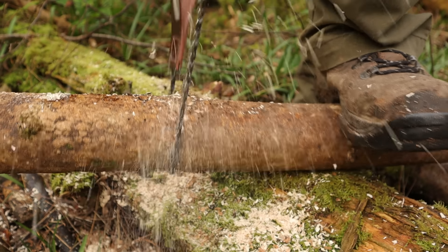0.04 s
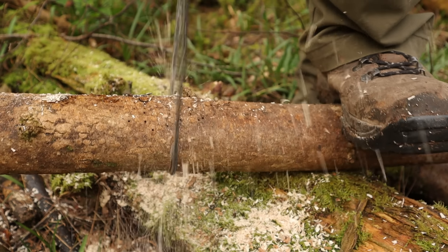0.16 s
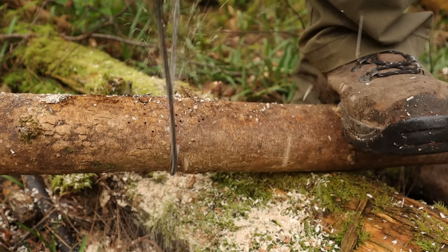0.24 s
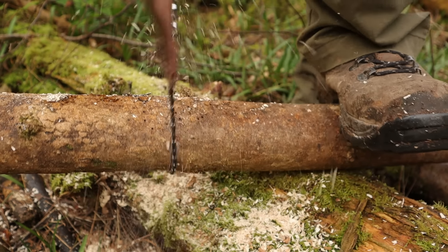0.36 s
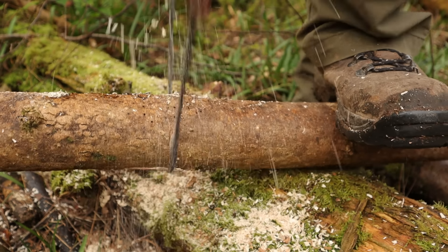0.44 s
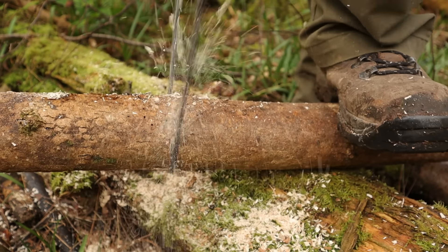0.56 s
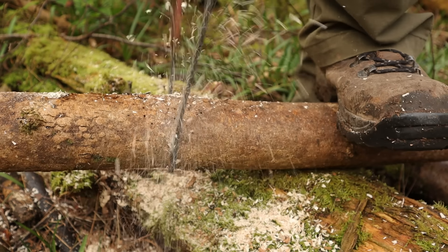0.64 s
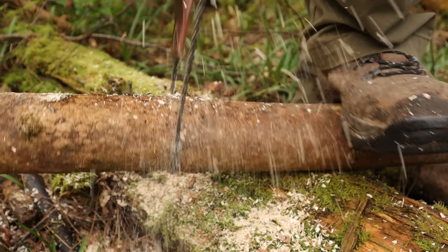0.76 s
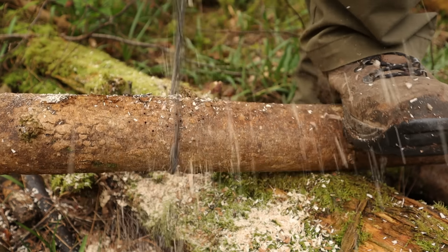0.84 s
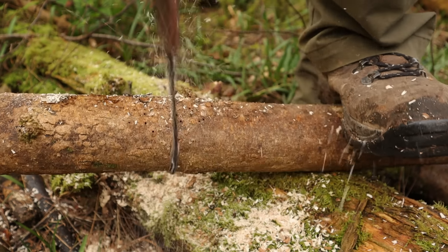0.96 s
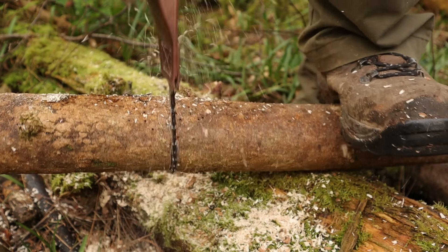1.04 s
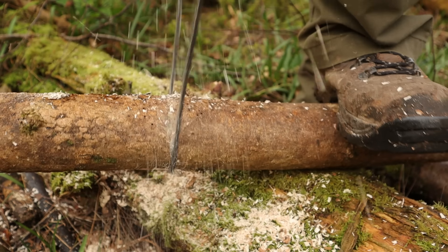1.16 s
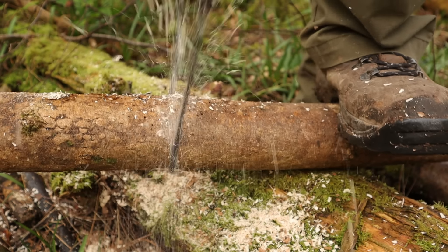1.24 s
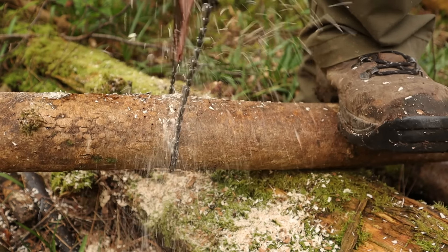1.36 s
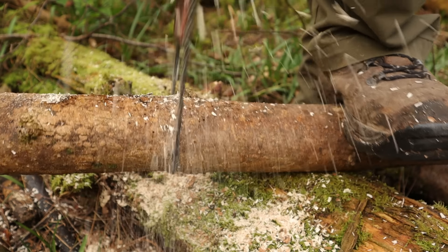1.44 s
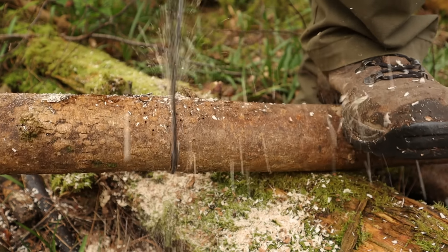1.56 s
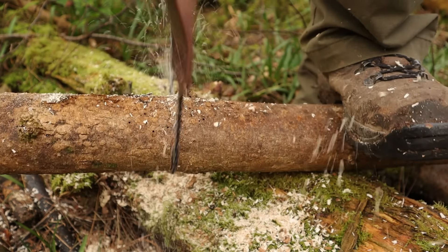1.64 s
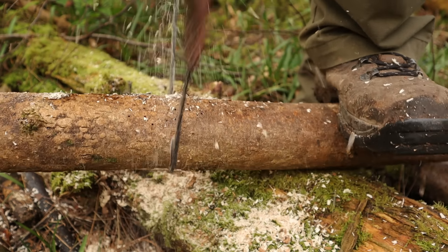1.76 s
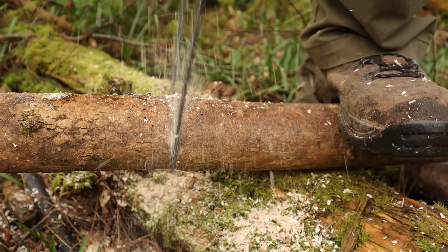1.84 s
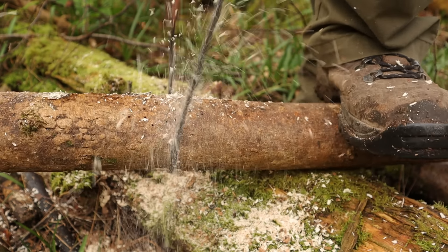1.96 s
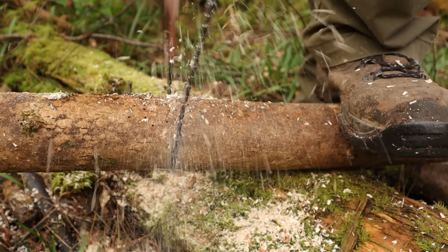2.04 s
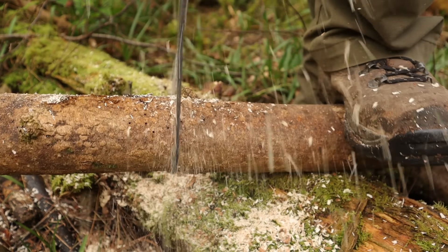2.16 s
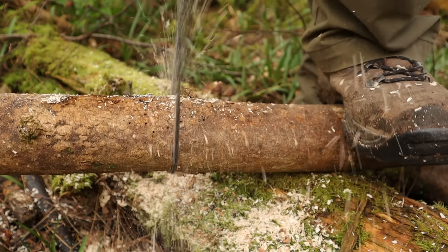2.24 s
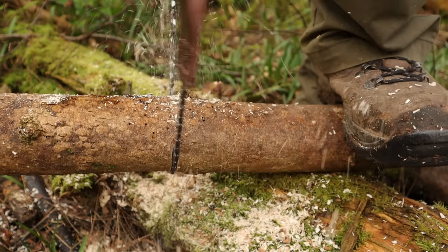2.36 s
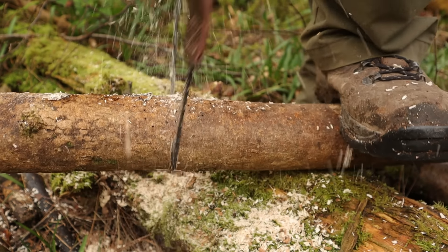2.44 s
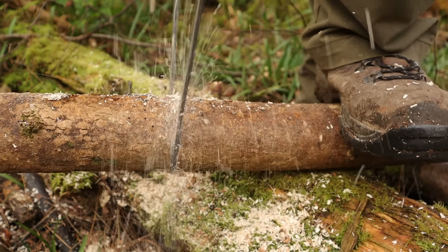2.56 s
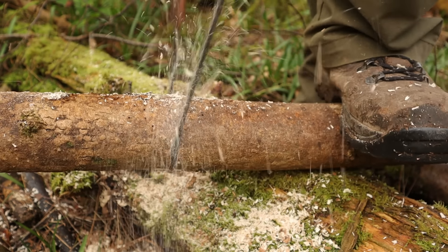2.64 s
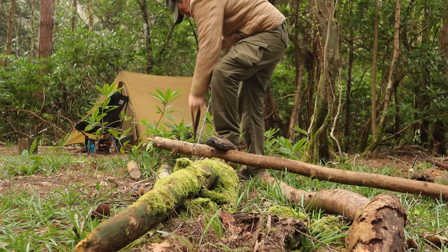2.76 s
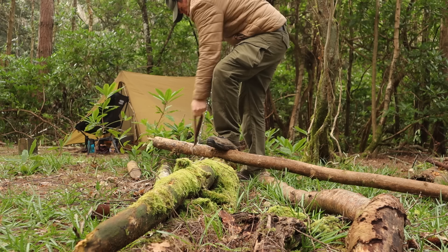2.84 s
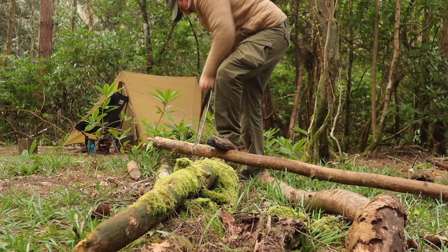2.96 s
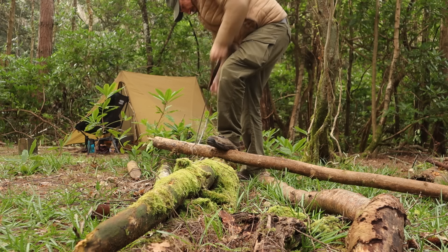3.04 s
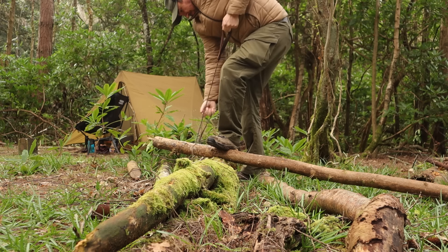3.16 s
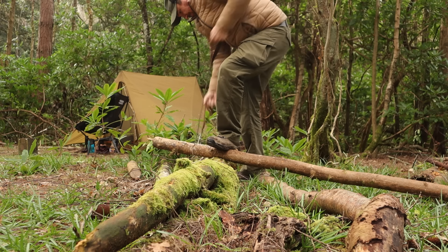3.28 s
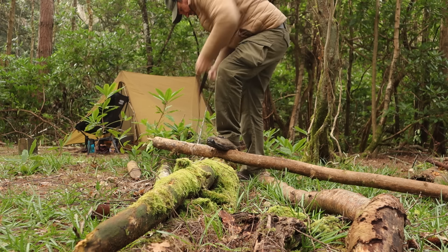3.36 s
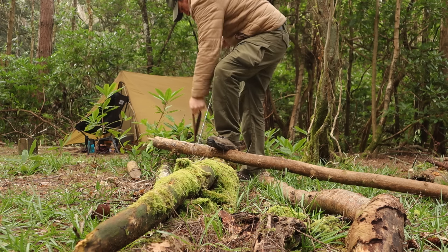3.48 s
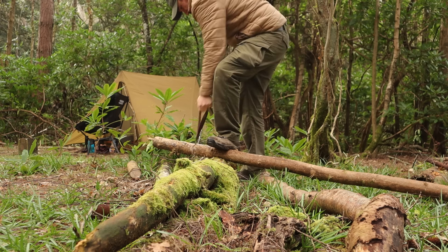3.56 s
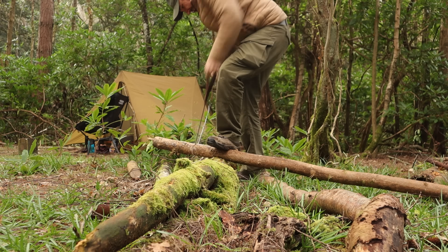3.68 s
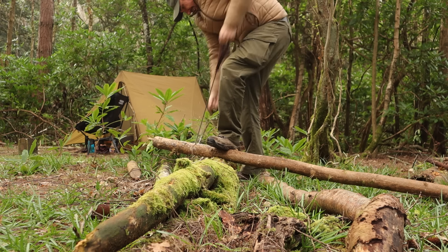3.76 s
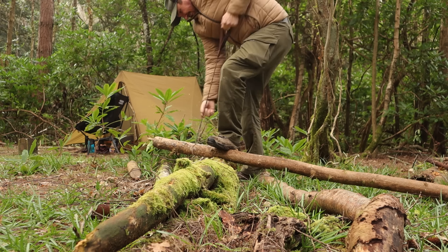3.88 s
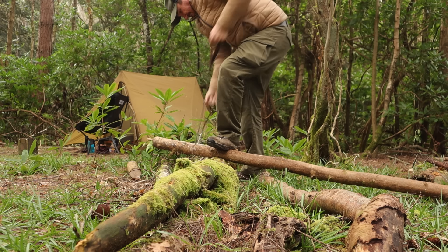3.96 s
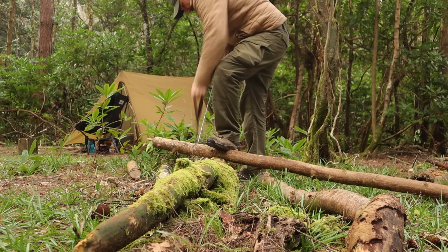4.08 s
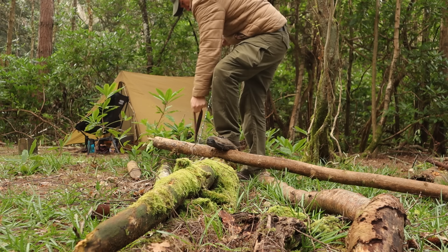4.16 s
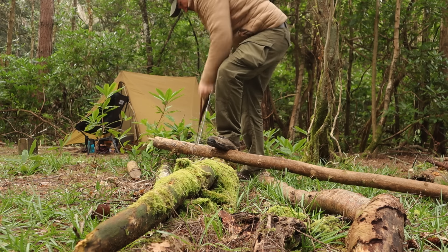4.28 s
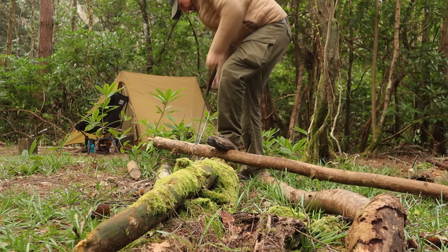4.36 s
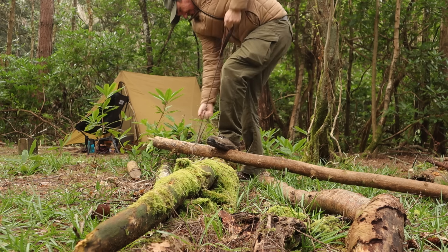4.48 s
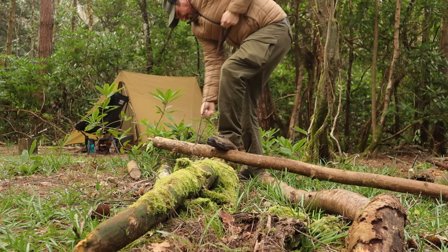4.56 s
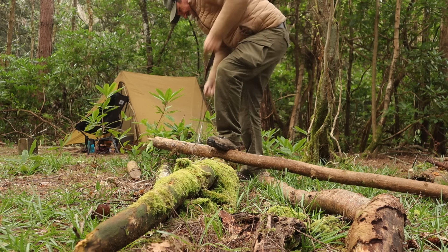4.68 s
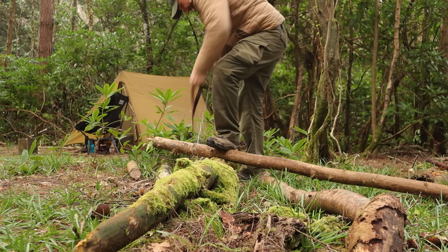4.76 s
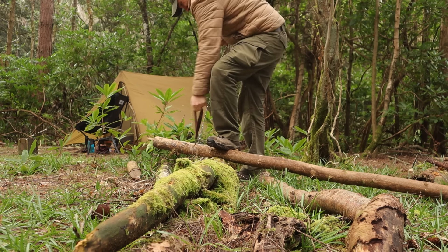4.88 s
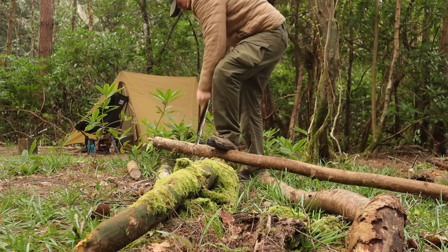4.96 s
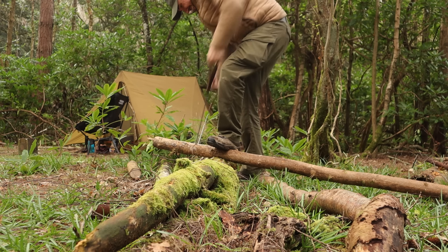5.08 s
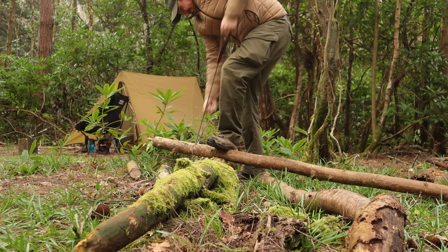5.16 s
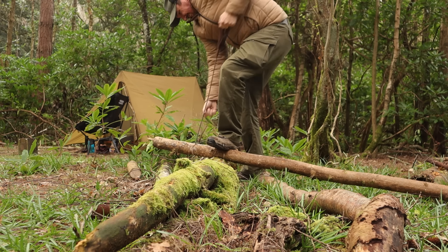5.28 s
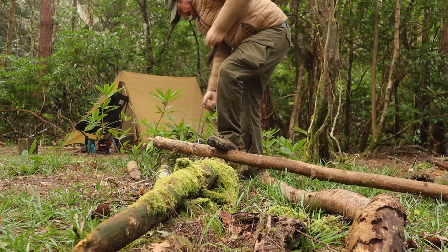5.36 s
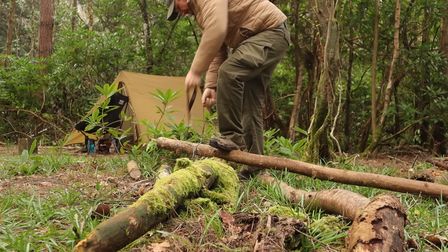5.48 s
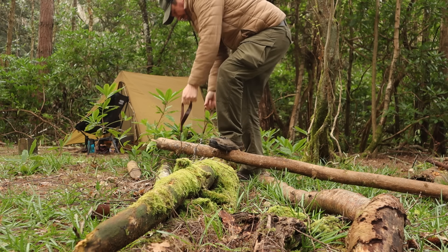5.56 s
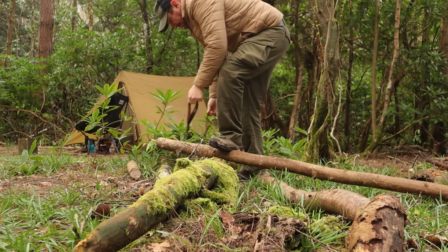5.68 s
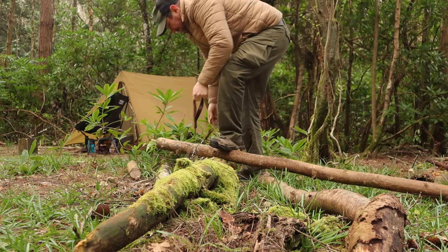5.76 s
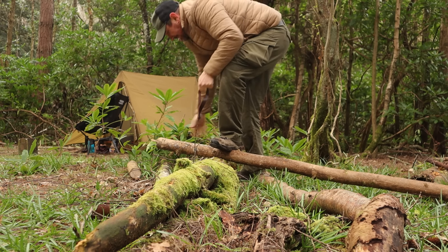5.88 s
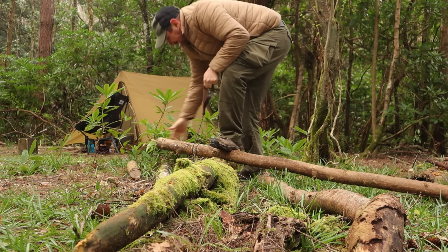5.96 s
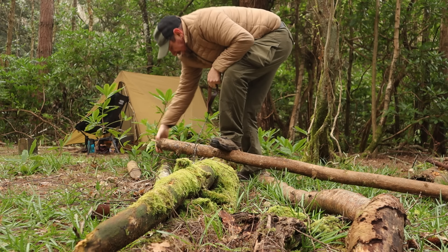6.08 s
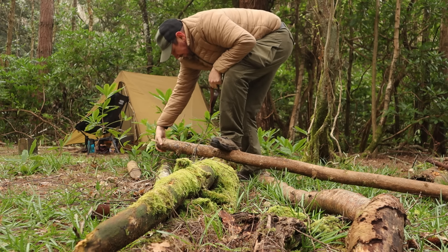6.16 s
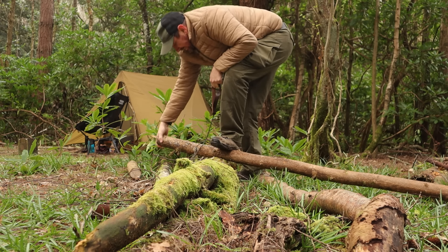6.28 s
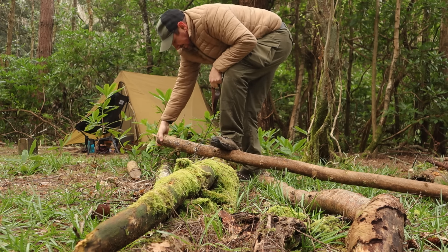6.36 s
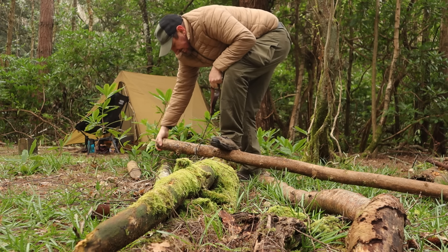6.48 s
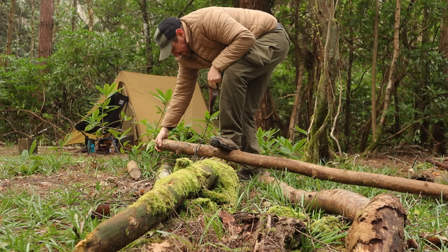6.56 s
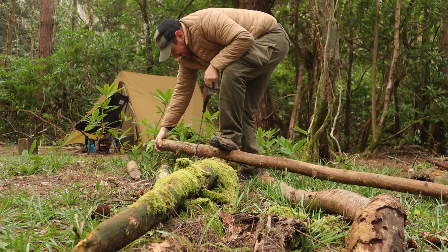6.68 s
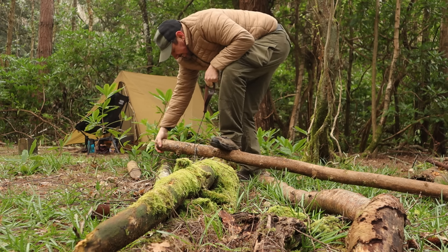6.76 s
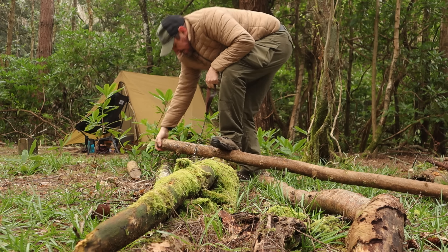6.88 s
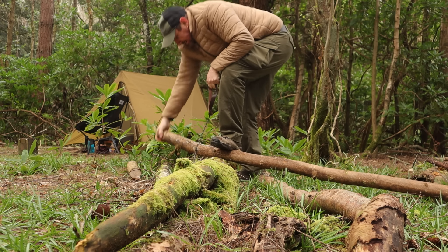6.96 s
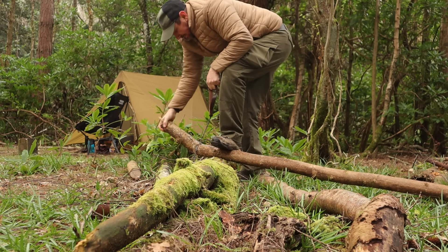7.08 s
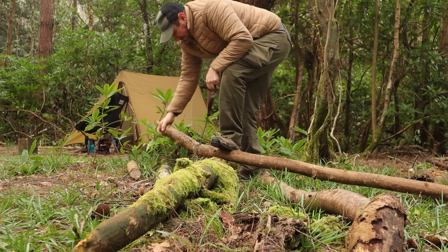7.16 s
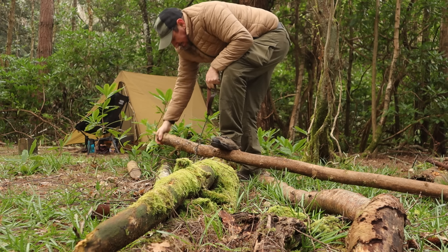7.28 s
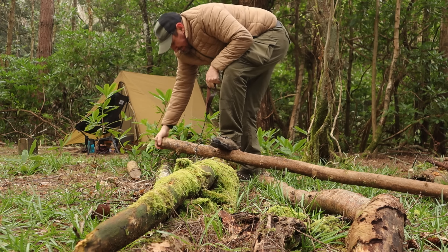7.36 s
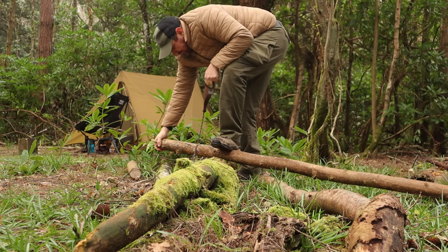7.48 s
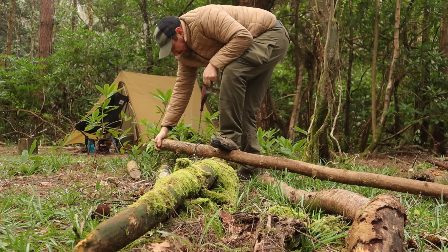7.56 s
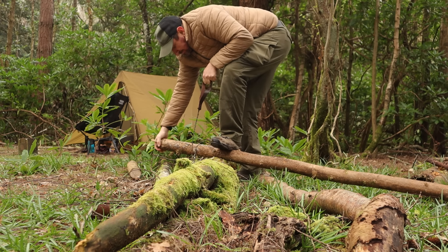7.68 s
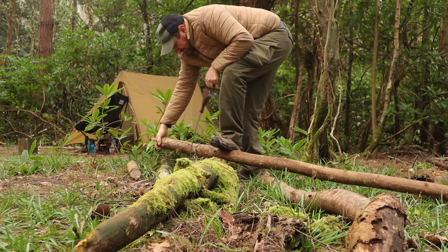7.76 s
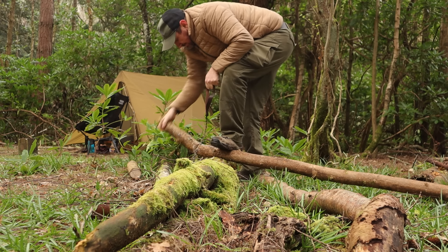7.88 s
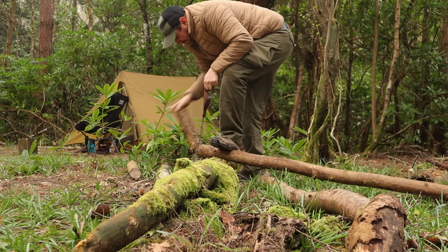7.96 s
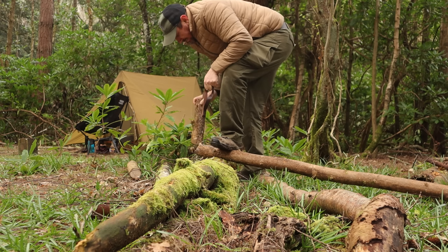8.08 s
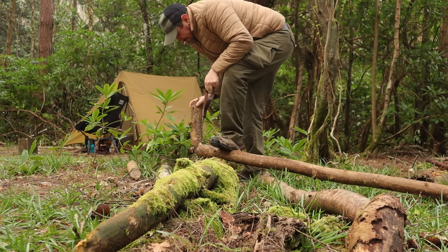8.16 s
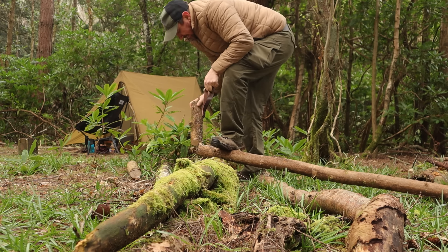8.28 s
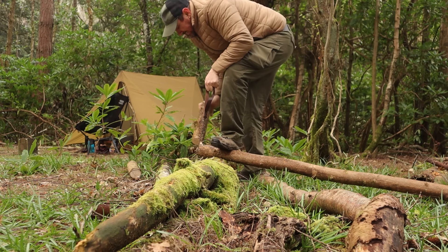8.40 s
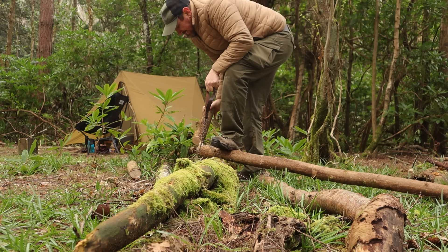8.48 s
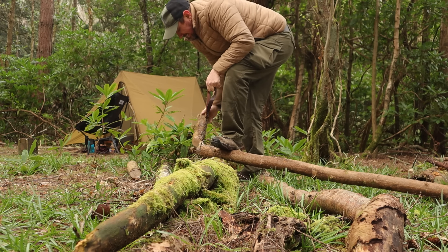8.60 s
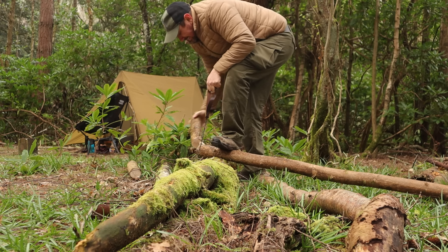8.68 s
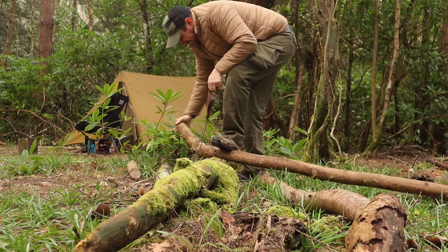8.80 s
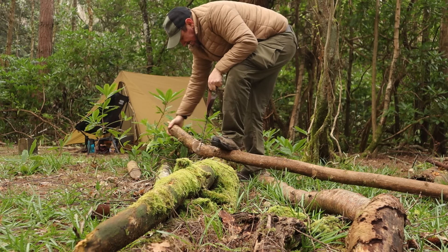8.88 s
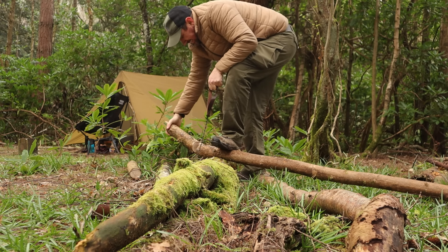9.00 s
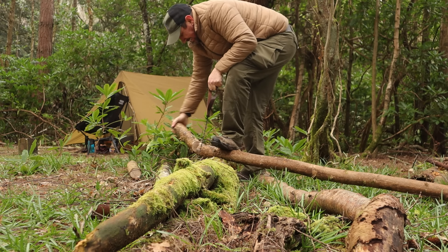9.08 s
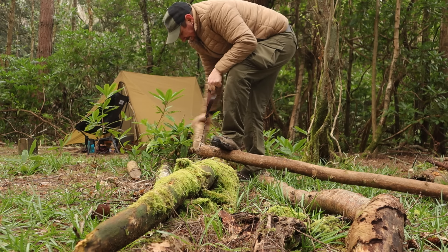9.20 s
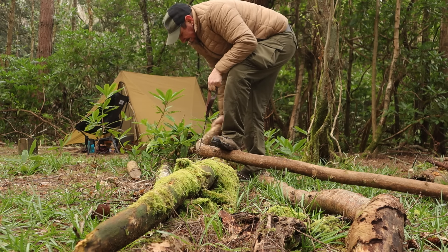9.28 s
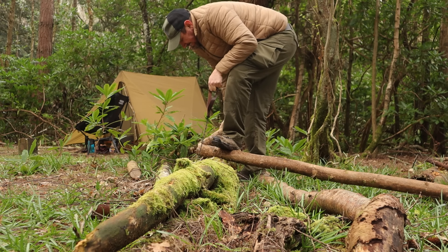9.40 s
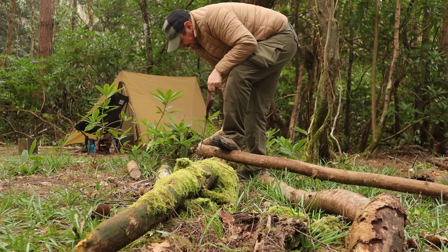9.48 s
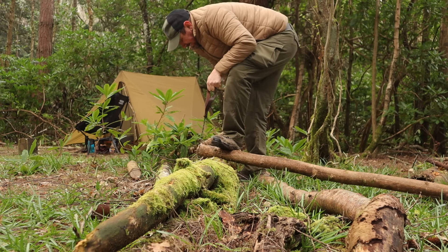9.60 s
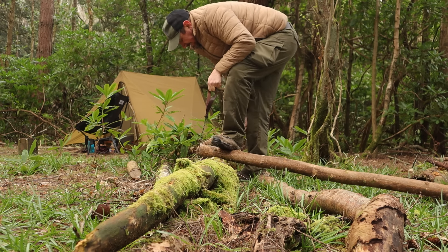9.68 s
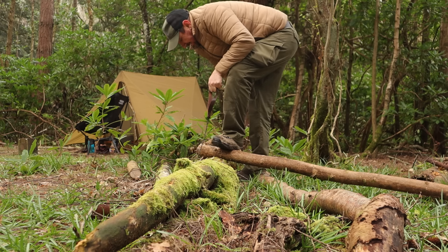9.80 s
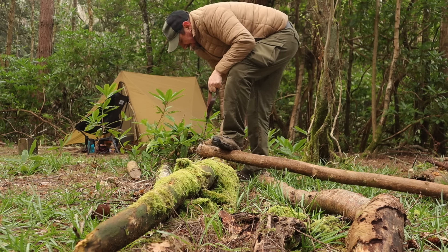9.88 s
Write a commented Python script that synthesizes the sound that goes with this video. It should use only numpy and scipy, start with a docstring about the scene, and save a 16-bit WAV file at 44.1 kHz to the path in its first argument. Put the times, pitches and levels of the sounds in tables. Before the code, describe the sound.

Outdoors in quiet woodland, brisk alternating saw pulls tear through a log, about three per second, first near the microphone with bright grit and hollow wood resonance, then abruptly more distant. After the last stroke there is near silence with soft air and fuzzy distant bird whistles. Loud, dry snaps of splitting wood come in separate clusters, with small crackles and a short scattered forest echo.

```python
"""A hand-pulled chain saw rasps through a fallen branch in woodland, first heard close, then from farther off:
each stroke is a run of tooth bites, jolts and tearing noise, that ring the modes of the branch.
The sawing stops; the half-cut end is bent back and its fibres crack in bursts of filtered clicks and noise
with decaying wood modes, while the bare clicks scatter among the trees. Noise-filled whistles of faint birds,
rustles and a low rumble of air, made from random spectra, lie underneath."""
import sys
import numpy as np
from scipy import signal
from scipy.fft import rfft, irfft, next_fast_len
from scipy.io import wavfile
from scipy.ndimage import uniform_filter1d

SR = 44100
rng = np.random.default_rng(int(sys.argv[2]) if len(sys.argv) > 2 else 0)


def digitize_waveform(pressure):
    """Quantize a signal to 16-bit integers and store it at the path in sys.argv[1].

    Rows of a 2-D input are taken as channels; values are limited to [-1, 1].
    """
    field = np.atleast_2d(pressure).T
    bounded = np.clip(field, -1, 1)
    quanta = np.round(bounded * 32767).astype(np.int16)
    wavfile.write(sys.argv[1], SR, quanta)


N = 438354
CHANGE_S = 2.74  # the scene changes from the close place to the far one

# pulls on the chain: grip t/s, crest t/s, ease t/s, crest level/dB, drop at the grip level/dB,
# drop at the ease level/dB, rasp level at the crest/dB, boom level at the crest/dB
STROKES = [(-.15, -.04, 0.074, -29, 6, 15, -49, -41.5), (.184, .266, 0.4, -27.5, 15, 11, -45, -41),
           (.53, .666, 0.77, -32, 7, 12, -49.5, -42.5), (0.891, .978, 1.087, -26.5, 14, 11, -44, -41.5),
           (1.227, 1.374, 1.43, -30, 8, 15, -47, -42), (1.55, 1.626, 1.746, -28, 17, 6, -45.5, -41),
           (1.865, 1.96, 2.094, -31, 16, 10, -47.5, -42.5),
           (2.235, 2.331, 2.439, -30.5, 7, 10.5, -46.5, -42),
           (2.572, 2.703, 2.728, -30.5, 8, 10.5, -47, -41.5), (2.68, 2.861, 2.89, -38, 1.24, 2, -50, -44),
           (3.015, 3.16, 3.245, -39.5, 10.5, 5, -52.5, -39.5),
           (3.402, 3.501, 3.567, -40.5, 3, 1.14, -51, -41.5), (3.69, 3.83, 3.91, -37, 14, 7, -51, -36),
           (4.042, 4.198, 4.234, -36.5, 10.5, 10.5, -47.5, -40.5),
           (4.345, 4.511, 4.576, -38.5, 15, 4, -50.5, -38), (4.728, 4.88, 4.95, -38.5, 6, 7, -48, -38.5),
           (5.071, 5.19, 5.28, -40, 12, 2, -51.5, -41), (5.423, 5.434, 5.44, -48.5, 8.5, 5, -60, -52.5)]


def amp(db):
    """Amplitude factor of a level in dB."""
    return 10 ** (np.asarray(db) / 20)


def evened(x):
    """Scales a sound to an rms of 1."""
    return x / np.sqrt(np.mean(x ** 2) + 1e-20)


def peaked(x):
    """Scales a sound to a peak of 1."""
    return x / abs(x).max()


def read(points, hz):
    """Reads a curve given over frequency, straight between its points on a log scale."""
    f, value = np.transpose(points)
    return np.interp(np.log(hz + 1), np.log(f + 1), value)


def add(mix, s, sound):
    """Lays a sound into the mix from time s on."""
    part = mix[round(s * SR):][:len(sound)]
    part += sound[:len(part)]


def band(x, lo_hz, hi_hz):
    """Keeps what lies between two frequencies."""
    return signal.sosfilt(signal.butter(2, [lo_hz, hi_hz], "band", fs=SR, output="sos"), x)


def split(x, lo_hz, hi_hz):
    """Three bands whose filters add up to one, each band then brought to rms 1."""
    n = next_fast_len(len(x))
    hz, z = np.fft.rfftfreq(n, 1 / SR), rfft(x, n)
    low = 1 / (1 + (hz / lo_hz) ** 6)
    top = 1 / (1 + (hi_hz / (hz + 1)) ** 6)
    return [evened(irfft(z * gain, n)[:len(x)]) for gain in (low, 1 - low - top, top)]


def click_response(colour, bumps):
    """Causal response to a click: minimum phase for the colour with peaks and dips laid over it."""
    hz = abs(np.fft.fftfreq(8192, 1 / SR))
    db = read(colour, hz) + sum(d / (1 + (2 * (hz - f) / width) ** 2) for f, width, d in bumps)
    log_gain = np.log(amp(np.maximum(db, -100)))
    return np.fft.ifft(np.exp(np.conj(signal.hilbert(log_gain)))).real[:4096]


def air(colour, db, patchy_db):
    """Random short-time spectra, coloured, with patches drifting over time and frequency."""
    hz = np.fft.rfftfreq(2048, 1 / SR)
    a, b, patches = rng.standard_normal((N // 512 + 5, 1025, 3)).T
    patches = uniform_filter1d(uniform_filter1d(patches, size=16, axis=0), size=8, axis=1)
    z = (a + 1j * b) * amp(read(colour, hz)[:, None] + patchy_db * evened(patches))
    return amp(db) * evened(signal.istft(z, nperseg=2048, noverlap=1536)[1][:N])


def near_air():
    """Still air at the close place, as coloured noise with strong patches."""
    # spectrum of the air: f/Hz, relative level/dB per Hz
    spectrum = [(15, 19), (45, -12), (70, 23.5), (105, 22.5), (160, 6), (600, -28), (2000, -8.5),
                (12500, -29), (13500, -60)]
    return air(spectrum, db=-58.5, patchy_db=3.5)


def far_air():
    """Still air at the far place, as coloured noise with weak patches."""
    # spectrum of the air: f/Hz, relative level/dB per Hz
    spectrum = [(13, -50.5), (22, -31.5), (66, -2.5), (240, -9.5), (323, -14), (350, -17), (483, -16),
                (685, -12.5), (2550, -31), (4610, -31.5), (5720, -38), (11800, -41), (13500, -54)]
    return air(spectrum, db=-60.5, patchy_db=1.0)


def birds():
    """Fuzzy far whistles: narrow noise carried along a gliding tone."""
    # distant calls: t/s, length/s, start f/Hz, end f/Hz, width of the fuzz/Hz, rms level before the swell/dB
    calls = [(5.506, 0.28, 4400, 4320, 300, -80), (5.88, 0.25, 4470, 4500, 300, -73),
             (6.205, 0.14, 1620, 1750, 90, -67), (6.435, 0.3, 4530, 4580, 300, -75),
             (6.7, 0.23, 3300, 3330, 200, -81), (6.93, 0.37, 4370, 4400, 200, -74),
             (7.343, 0.37, 8500, 8350, 80, -86.5), (7.83, 0.2, 2900, 3570, 250, -73.5),
             (7.91, 0.097, 3750, 4140, 220, -65.5)]
    out = np.zeros(N)
    for s, length, start_hz, end_hz, width, db in calls:
        t = np.arange(0, length, 1 / SR)
        r = np.exp(-np.pi * width / SR)
        fuzz = signal.lfilter([1], [1, -2 * r, r * r], rng.standard_normal((2, 30000)))
        fuzz = fuzz[:, 2000:2000 + len(t)]  # past the filter's build-up
        phase = 2 * np.pi * (start_hz * t + (end_hz - start_hz) * t ** 2 / (2 * length))
        call = fuzz[0] * np.cos(phase) + fuzz[1] * np.sin(phase)
        add(out, s, amp(db) * evened(call) * signal.windows.tukey(len(t), .6))
    return out


def trees(x):
    """Scattered echoes from trunks: a noise tail in which each band dies at its own speed."""
    # decay among the trunks: f/Hz, t60/s
    decay = [(200, 0.14), (1000, 0.69), (3000, 0.54), (8000, 0.52), (15000, 0.29)]
    hz, t, z = signal.stft(rng.standard_normal(SR), SR, nperseg=256)
    tail = signal.istft(z * amp(-60 * t / read(decay, hz)[:, None]), SR, nperseg=256)[1]
    tail *= np.minimum(np.arange(len(tail)) / (0.0063 * SR), 1)  # 6.3 ms build-up
    return signal.fftconvolve(x, tail / np.linalg.norm(tail))[:N]


def rustles():
    """Leaves and cloth stirring: dense tiny crackles under a soft swell."""
    # stirrings: t/s, length/s, rms level before the swell/dB
    stirrings = [(5.377, 0.2, -65), (8.399, 0.1, -69.5), (8.49, 0.12, -63), (8.811, 0.1, -68),
                 (9.273, 0.17, -66), (9.645, 0.11, -68.5)]
    out = np.zeros(N)
    for s, length, db in stirrings:
        a, b = rng.standard_normal((2, 20000))[:, :round(length * SR)]
        crackle = amp(5.1 * evened(uniform_filter1d(a, size=120))) * b
        swell = signal.windows.tukey(len(a), .7)
        add(out, s, amp(db) * evened(band(crackle, 2140, 5700)) * swell)
    return out


def lurches():
    """The propped branch lurches and thuds as strokes turn round: a soft deep wobble of a few cycles."""
    # wobbles: t/s, f/Hz, peak level/dB
    wobbles = [(.4, 42, -54), (1.068, 42, -50), (1.05, 105, -55), (1.74, 105.1, -49.5), (1.76, 42, -56),
               (2.09, 105, -49.5), (2.4, 104.8, -50.5), (2.449, 42, -53)]
    out, t = np.zeros(N), np.arange(0, .14, 1 / SR)
    for s, hz, db in wobbles:
        add(out, s, amp(db) * np.sin(2 * np.pi * hz * t) * np.hanning(len(t)))
    return out


def snap(db, middle_db, high_db, top_db):
    """A jolt amid splitting fibres rings the wood; the trees get only the bare jolt, in the same five bands."""
    # deep, middle and high modes of the bent end, one group each: f/Hz, relative level/dB, t60/s
    wood = [
        [(300, -20, 0.023), (414, -9, 0.089), (513, -14, 0.031)],
        [(790, -20, 0.017), (1122, 8.5, .06), (1290, 0.5, 0.052)],
        [(1750, 3.5, 0.017), (2060, -4, 0.026), (2900, -6, 0.062)],
    ]
    length_s, deep_db = .0013, -22.5  # snap length; deep ring against the main burst
    t = np.arange(4000) / SR
    jolt = 1. * (np.arange(len(t)) == round(length_s / 2 * SR))
    splinters = t / length_s * np.exp(1 - t / length_s * 2) + .1 * np.exp(-t / (4 * length_s))
    splinters += .16 * np.roll(splinters, round(.0052 * SR))  # thrown back by the ground
    burst = jolt + 0.54 * splinters * rng.standard_normal(len(t))

    # main, top, deep, middle, high: neighbours in opposite phase join without a gap
    edges_hz = [(2200, 5800), (6800, 12000), (130, 600), (700, 1500), (1500, 2500)]
    gains = amp(db + np.array([0, top_db, deep_db, middle_db, high_db])) * [-1, 1, 1, -1, 1]
    rings = [0, 0]  # main and top have no modes
    for group in wood:
        ring = sum(amp(d - 60 * t / t60) * np.sin(2 * np.pi * f * t) for f, d, t60 in group)
        rings.append(peaked(ring))
    direct = [peaked(peaked(band(burst, *e)) + ring) for e, ring in zip(edges_hz, rings)]
    bare = [peaked(band(jolt, *e)) for e in edges_hz]  # without the wood's rings
    return np.array([gains @ direct, gains @ bare])


def cracks():
    """The bent end's fibres snap, large and small; returns the direct sound and what goes to the trees."""
    # large snaps, before the microphone's colour: t/s, main peak level/dB;
    # against it: middle ring level/dB, high ring level/dB, splintery top level/dB
    large = [(5.4301, -34.5, -4, -14, -6.5), (5.5054, -41, -12, -13, -12), (5.5628, -35, -21, -12, -35),
             (6.0144, -46.5, -13.5, -17, -19), (6.387, -23.5, -7, -9, -8.5), (6.4141, -36.5, -4, -10, -26),
             (7.0647, -37, -2.5, -22, -14.5), (7.0686, -27.5, -4, -12, -17), (7.0799, -21.5, -14, -14, -22),
             (7.1009, -15.5, -9.5, -33, -12.5), (7.176, -9, -5.5, -15, -8), (7.202, -27.5, -11, -32, -2),
             (7.22, -16.5, -17, -41, -38), (8.0036, -10.5, -18, -22, -14), (8.0225, -8, -18, -23, -32),
             (8.0279, -21, -15, -27, -18), (8.0628, -19.5, -18, -27, -6), (8.0856, -27, -9, -24, 2),
             (8.1049, -29.5, -22, -24, -1), (8.132, -38, -17, -24, 1.5), (8.1464, -33.5, -20, -16, -4),
             (8.6829, -40.5, -21, -32.5, -15), (8.86, -45.5, -12, -19, -14), (8.9273, -41, -22, -8, -12),
             (8.943, -23, -20.5, -1.5, -20.5), (9.279, -15.5, -26, -8.5, -15), (9.2904, -25, -20, -9, -6),
             (9.3182, -38.5, -10, -8, 5.5), (9.3485, -28.5, -16, -17, -1), (9.3722, -31.5, -12.5, -10, 3),
             (9.764, -40, -10, -7, -3)]
    # small fibres giving way at random, before the microphone's colour: start t/s, length/s, snaps per s,
    # central main peak level/dB
    crackle = [(5.381, .23, 19.6, -55), (8.028, .14, 90, -38.5), (8.41, .07, 38, -61),
               (8.635, .11, 49, -58), (9.297, .12, 70, -47.5), (9.664, .065, 60, -47)]
    # peaks and one dip of the microphone's colour: f/Hz, width/Hz, level against the flat part/dB
    mic_colour = [(3200, 450, 0.5), (5300, 250, 5), (6200, 1400, -10.5), (8500, 1300, 0)]
    small_db, small_spread_db = (-13, -21.5, -5.5), 5.5  # middle, high, top; spread of all four levels
    out, rows = np.zeros((N, 2)), list(large)
    for start, length, per_s, db in crackle:
        place = rng.random(20)
        spread = small_spread_db * rng.standard_normal((20, 4))
        slots = np.arange(0, length, 1 / per_s)[:20]  # one snap falls somewhere in each slot
        for s, p, d in zip(slots, place, spread):
            rows.append((start + s + p / per_s, *(d + [db, *small_db])))
    for s, *levels in rows:
        add(out, s, snap(*levels).T)
    mic = click_response([(40, -40), (130, 0), (10000, 0), (16000, 0)], mic_colour)
    return signal.oaconvolve(out.T, mic[None])[:, :N]


def near_branch():
    """Click response of the branch under the chain, heard close."""
    # broad colour: f/Hz, relative level/dB per Hz
    colour = [(76, -68), (130, -19), (303, -7), (522, -7.5), (589, 11), (692, -17), (765, -2.5), (1030, -8),
              (1460, -11), (1640, -9.5), (3530, -19), (4150, -22), (5850, -22.5), (10900, -26),
              (16000, -42)]
    # resonances: f/Hz, width/Hz, level above the colour/dB
    modes = [(300, 41, 6.7), (407.4, 65, 7.1), (593, 6.2, 4), (721.5, 33, 10.3), (818, 110, 8),
             (1040.5, 105, 12.9), (1319, 146, 7.3), (4160, 570, 12.7), (5160, 180, 7.1)]
    return click_response(colour, modes)


def far_branch():
    """Click response of the branch under the chain, heard from farther off."""
    # broad colour: f/Hz, relative level/dB per Hz
    colour = [(15, -56), (25, -22.5), (130, -16.5), (170, -13.5), (263, -5.5), (405, -7), (451, -10.5),
              (775, -9.5), (1020, -11.5), (1520, -1.5), (1740, -11.5), (2990, -9), (6210, -28),
              (8830, -25.5), (16000, -40.5)]
    # resonances and dips: f/Hz, width/Hz, level against the colour/dB
    modes = [(128.7, 25, 7), (268.5, 22, 9.5), (764, 23, 11), (1032, 27, -6.5), (1610, 97, 3.5),
             (2100, 83, 7), (2900, 62, -6), (5310, 220, 8)]
    return click_response(colour, modes)


def blunt(x):
    """A tooth takes a moment to land, which rounds off the top of its jolt."""
    return signal.lfilter(*signal.butter(2, 4500, fs=SR), x)


def catches(near, far):
    """A tooth that snags jolts the branch just as a bite does, only harder."""
    # teeth that catch hard: t/s, peak level between 1.5 and 9 kHz/dB
    snags = [(0.1624, -44), (0.2425, -33), (0.5282, -32), (0.656, -25.5), (0.964, -18.5), (1.227, -37),
             (1.2705, -27), (1.5986, -19.5), (1.694, -18.5), (2.214, -41), (2.3508, -25), (2.5681, -25.5),
             (2.6956, -26), (2.793, -28), (3.355, -32.5), (3.3934, -28), (3.4352, -30), (3.5024, -28),
             (3.528, -23), (3.5851, -27), (3.7197, -28), (3.7587, -28.5), (3.7804, -21.5), (4.1235, -28),
             (4.1733, -26), (4.4711, -29), (4.7167, -33.5), (4.8887, -23.5), (4.9124, -31), (5.0644, -38),
             (5.1498, -27.5), (5.1792, -30.5)]
    out, t = np.zeros(N), np.arange(300) / SR
    for s, db in snags:
        jolt = 0.099 * np.exp(-t / 0.0019) * rng.standard_normal(len(t)) - 2 * blunt(1. * (t == 0))
        sound = signal.fftconvolve(jolt, near if s < CHANGE_S else far)
        sound = band(sound, 1200, 15000)  # too brief to stir the low modes
        add(out, s, amp(db) * sound / abs(band(sound, 1500, 9000)).max())
    return out


def steadied(x, size):
    """Evens out the level over a stretch, as the pull sets the power that goes into the cut."""
    return x / np.sqrt(uniform_filter1d(x ** 2, size=size) + 1e-9)


def shifting(x, patchy_db):
    """The chain works on ever new fibres, so the modes of the branch swell and fade in turn."""
    hz, _, z = signal.stft(x, SR, nperseg=1024)
    patchy_db = patchy_db / (1 + (hz[:, None] / 1800) ** 4)  # the hiss of the fibres above stays even
    patches = rng.standard_normal(z.T.shape).T
    patches = uniform_filter1d(uniform_filter1d(patches, size=4, axis=0), size=8, axis=1)
    return signal.istft(z * amp(patchy_db * evened(patches)), nperseg=1024)[1][:N]


def follow(strokes, crest_db, grip_share, ease_share, attack, release, slowing, lead, trail, rest_db):
    """Level in dB: a jerk, a quick attack up to the grip, a rounded crest, a quick release, a stop."""
    crest_curve = 1.4  # 1 is a pointed crest, more is rounder
    start_db_per_s = 2500  # the chain jerks into motion and stops as sharply
    t = np.arange(0, N + 64, 64) / SR
    grip, crest, ease, _, grip_db, ease_db = strokes[:6]
    rise = grip_share * grip_db * np.clip((crest - t) / (crest - grip), 0, 1) ** crest_curve
    fall = ease_share * ease_db * np.clip((t - crest) / (ease - crest), 0, 1) ** crest_curve
    after = np.maximum(t - ease, 0)
    ends = attack * np.maximum(grip - t, 0) + release * after / (1 + after / slowing)
    ends += start_db_per_s * (np.maximum(grip - lead - t, 0) + np.maximum(after - trail, 0))
    level = (crest_db - rise - fall - ends).max(axis=0)
    # reverberation holds the level up between strokes
    level = np.where(t < ease.max(), np.maximum(level, rest_db), level)
    return np.interp(np.arange(N) / SR, t, np.maximum(level, -120))


def saw(strokes, layers, response, teeth_per_s, uneven, spread_db, scrape_db, grit_db):
    """Teeth bite at a rate set by the pull; each bite is a sharp jolt and a short tearing of fibres."""
    strokes = np.transpose(strokes)[:, :, None]
    columns = (3, 6, 7)  # crest levels of body, rasp and boom
    pull_db, rasp_db, boom_db = [follow(strokes, strokes[k], *layer) for k, layer in zip(columns, layers)]
    wander, bite_size, fibres, grit_swell, grit_noise = rng.standard_normal((5, N))

    speed = amp(0.23 * (pull_db - pull_db.max()))  # 1 at the hardest pull
    rate = teeth_per_s * speed * np.exp(uneven * evened(uniform_filter1d(wander, size=300)))
    turns = np.cumsum(rate) / SR
    bites = np.diff(np.floor(turns), prepend=0) * amp(spread_db * bite_size) * speed
    tearing = signal.lfilter([1], [1, -np.exp(-1 / (0.0059 * SR))], bites) * fibres  # dies over 5.9 ms
    # chips dragged along the cut
    grit = amp(grit_db * evened(uniform_filter1d(grit_swell, size=25))) * grit_noise
    drive = evened(tearing - 9 * blunt(bites)) + amp(scrape_db) * evened(grit)
    drive = steadied(drive, size=1500)

    ringing = shifting(signal.oaconvolve(drive, response)[:N], patchy_db=3.)
    boom, body, rasp = split(ringing, 450, 2500)
    boom, body = steadied(boom, size=3000), steadied(body, size=2000)
    return amp(pull_db) * body + amp(rasp_db) * rasp + amp(boom_db) * boom


def near_saw(branch):
    """The strokes heard close: fast bites whose body, rasp and boom follow each pull in their own way."""
    # body, rasp of tearing fibres, boom of the whole branch: share of the grip drop, share of the ease drop,
    # attack/dB per s, release/dB per s, time over which the release slows to half/s,
    # time from the chain's start to the grip/s, time from the ease to the stop/s, rest level/dB
    layers = [(1.01, 1.01, 600, 750, .08, .035, .07, -80), (0.73, 0.73, 300, 447, 0.26, 0.03, 0.028, -88),
              (1.54, 0.55, 799, 550, .15, .04, .07, -82)]
    strokes = [row for row in STROKES if row[1] < CHANGE_S]
    return saw(strokes, layers, branch, teeth_per_s=260, uneven=.35, spread_db=3., scrape_db=1.5, grit_db=3.)


def far_saw(branch):
    """The strokes heard from farther off: slower bites with body, rasp and boom following each pull."""
    # body, rasp of tearing fibres, boom of the whole branch: share of the grip drop, share of the ease drop,
    # attack/dB per s, release/dB per s, time over which the release slows to half/s,
    # time from the chain's start to the grip/s, time from the ease to the stop/s, rest level/dB
    layers = [(1.01, 1.01, 450, 450, .15, .015, .07, -67),
              (0.65, 0.25, 180, 260, 0.15, 0.017, 0.036, -70.5),
              (1.39, 0.42, 490, 280, 0.19, 0.018, 0.068, -60.5)]
    strokes = [row for row in STROKES if row[1] > CHANGE_S]
    return saw(strokes, layers, branch, teeth_per_s=140, uneven=.3, spread_db=3.7, scrape_db=-.4, grit_db=3.)


def scene():
    """The close place gives way to the far one in an equal-power fade of 64 ms."""
    far = np.clip((np.arange(N) / SR - CHANGE_S) / 0.064 + .5, 0, 1)
    near_response, far_response = near_branch(), far_branch()
    direct, scattered = cracks()
    near = near_air() + lurches() + near_saw(near_response)
    distant = far_air() + birds() + rustles() + far_saw(far_response)
    distant += direct + amp(-13) * trees(scattered)
    places = np.sqrt(1 - far) * near + np.sqrt(far) * distant
    return (places + catches(near_response, far_response))[None]


def record(dry):
    """The microphone channel's band limit: a steep low-pass at 15.9 kHz."""
    lowpass = signal.firwin(511, 15900, window=("kaiser", 9), fs=SR)
    return signal.oaconvolve(dry, lowpass[None], "same")


dry = scene()
out = record(dry)
digitize_waveform(out)
```